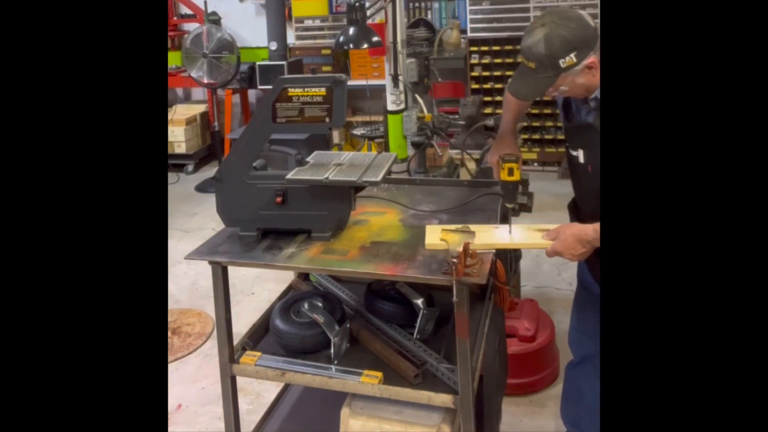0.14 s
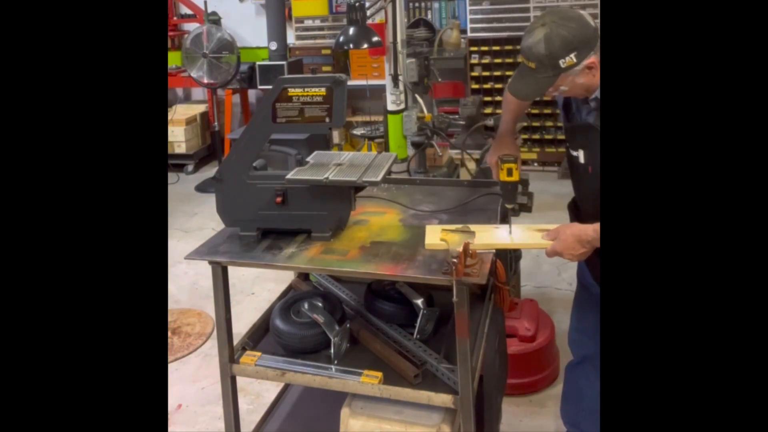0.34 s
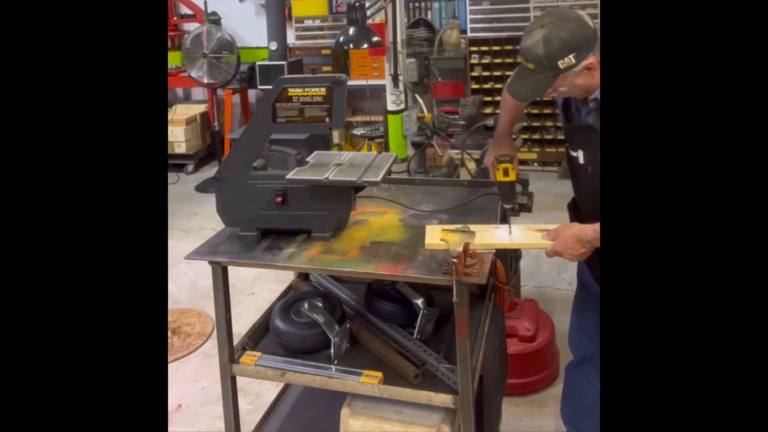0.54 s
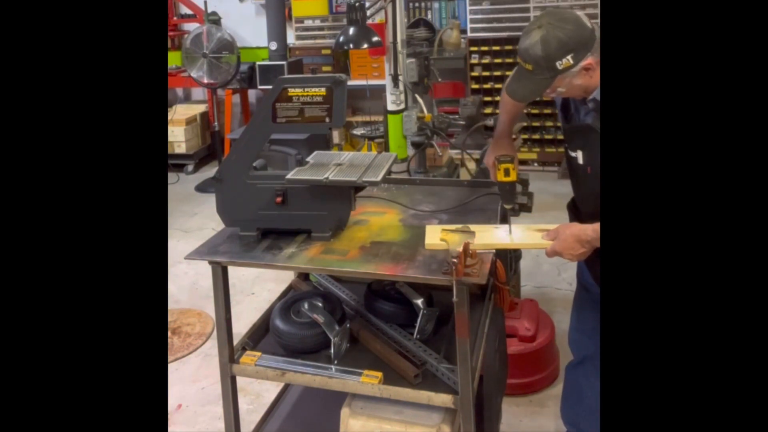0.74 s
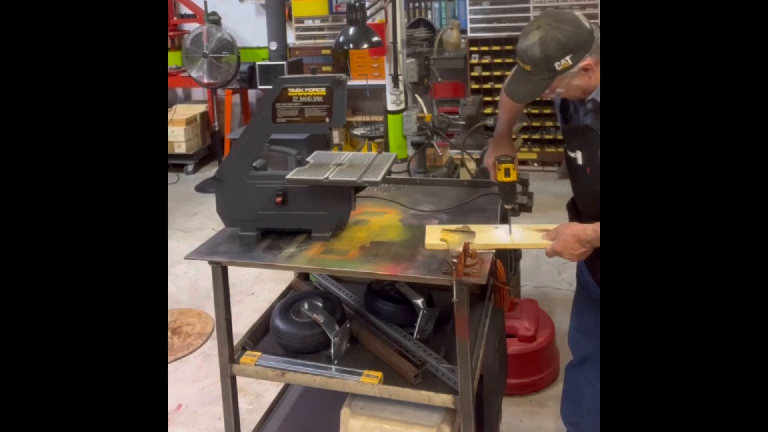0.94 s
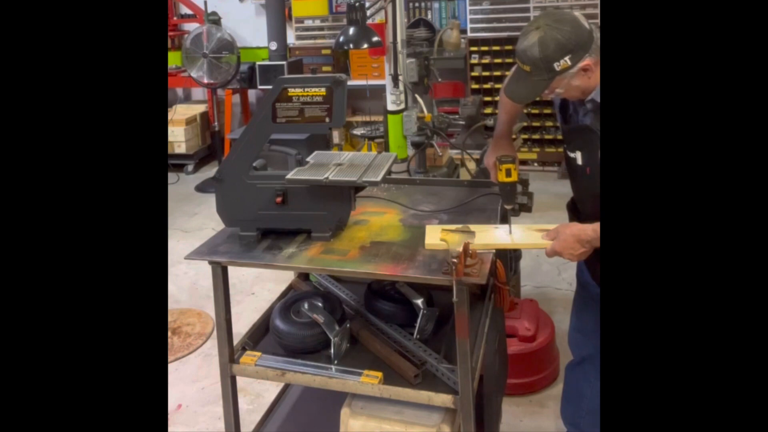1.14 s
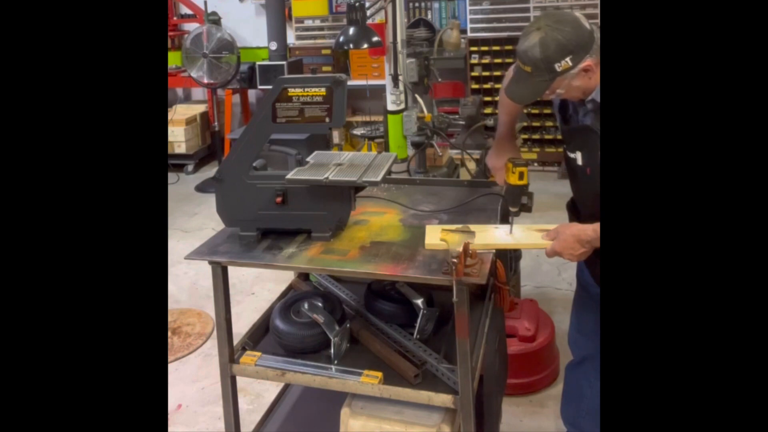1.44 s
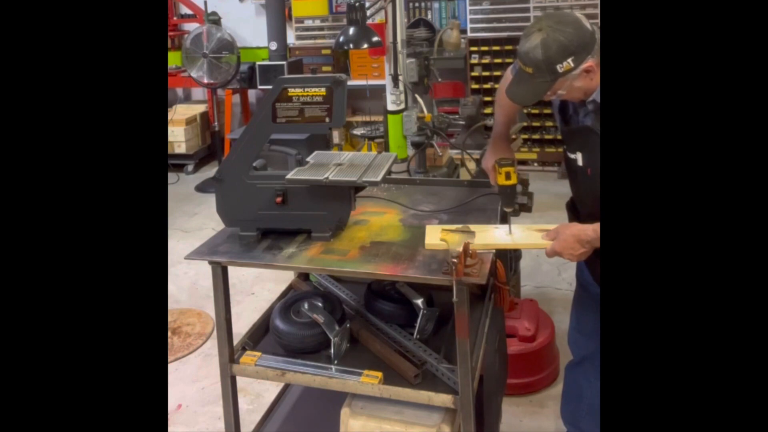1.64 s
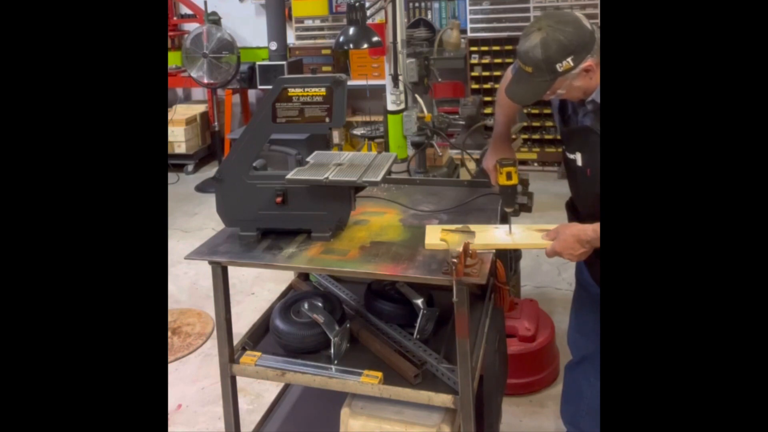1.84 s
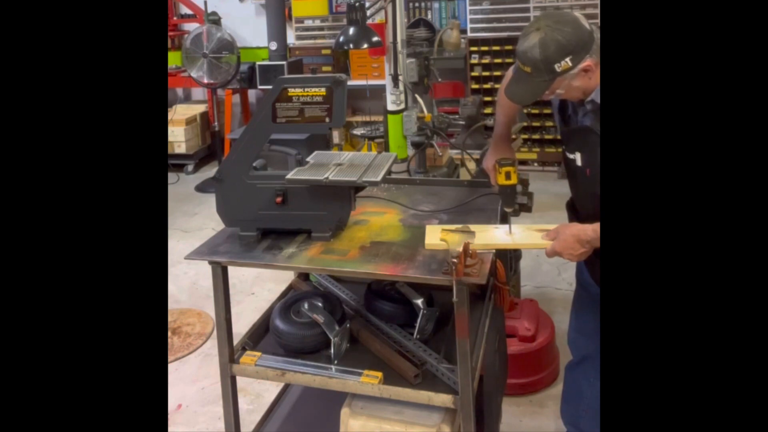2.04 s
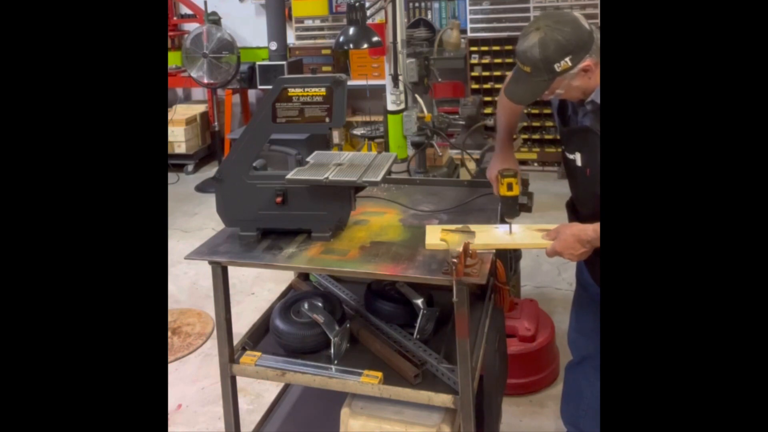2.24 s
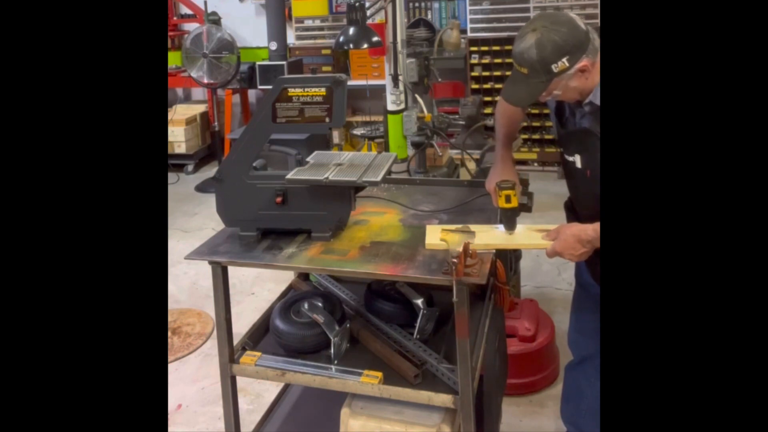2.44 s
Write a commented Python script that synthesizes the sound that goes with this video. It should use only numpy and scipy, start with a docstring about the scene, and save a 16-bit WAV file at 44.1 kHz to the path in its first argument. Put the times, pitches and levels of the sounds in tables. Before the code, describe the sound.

In a live-sounding workshop, a hand drill grinds into wood at nearly constant speed, sags briefly midway, then breaks through with a quick low knocking shudder and runs on lighter and cleaner, heard fairly near in stereo.

```python
"""A cordless drill bores through a wooden board in a workshop.
The motor whines in tones locked to its speed and its gears rattle in a resonant housing;
the bit rasps as random fibre snaps, rings, squeals and excites the board's modes, and the speed sags when it bites.
The bit breaks through with a short knocking shudder of struck modes, drags once in the hole and runs on free.
A fan hiss and a coloured background lie beneath; a diffuse room surrounds the microphone pair."""
import sys
import numpy as np
from scipy import signal
from scipy.fft import rfft, irfft, next_fast_len
from scipy.io import wavfile

SR = 44100
rng = np.random.default_rng(int(sys.argv[2]) if len(sys.argv) > 2 else 0)


def pcm_store(signal):
    """Save signal as 16-bit PCM."""
    levels = np.round(np.clip(np.atleast_2d(signal), -1, 1) * 32767)
    wavfile.write(sys.argv[1], SR, levels.astype(np.int16).T)


N = 114660
TIME = np.arange(N) / SR
SIZE = next_fast_len(N + SR)
HZ = np.maximum(np.fft.rfftfreq(SIZE, 1 / SR), 1)

# modes of the board: [f/Hz, width/Hz, relative level/dB under the cutting edge, relative level/dB when knocked]
BOARD_MODES = [(59.7, 9.5, -12, -6), (151.2, 6, -15, -5), (197, 4.1, -10, -0.5), (290.6, 6.8, -20.5, 8.5),
               (319.3, 16, -0.5, -10), (362, 10, -19, 0), (446.6, 11, -5, 2), (535, 29, -8, -18),
               (627, 21, -1.5, 4), (891, 120, -13, -8)]

# motor and gear tones
CUT_WHINE_DB, FREE_WHINE_DB = 1, 2.5
SPIN_UP_S, FREED_S, FREEING_S = 0.15, 2.2, 0.12
TONE_FLUTTER_HZ, SPEED_WOBBLE = 12, .0009
HUM_BELOW, HUM_DB = 2, -2.5  # tones below this multiple of the speed follow the board's drone
# gear rattle: grinding noise is relative to clashes of unit power
RATTLE_DB, TEETH_PER_TURN, TOOTH_SPREAD_DB, GRIND = 2.5, 4.2, 2, 0.51
GEAR_RATIO, TURN_SWING_DB, FLICKER_DB = 24, 0.38, 0.86  # motor turns per chuck turn
# cutting: snaps are relative to a rub of unit power
CHIPS_PER_S, CHIP_SPREAD_DB, CHIP_SHARE = 3000, 2, 0.41
RASP_DB, BIT_DB, BOARD_DB = 4, -31.5, -6
FAN_DB, FLOOR_DB = -35.5, -60
SQUEAL_ROUGH, SQUEAL_FLUTTER_HZ = 0.37, 60
# stick-slip judder: slips per s, their relative unevenness, level
JUDDER_START_S, JUDDER_ATTACK_S, JUDDER_HOLD_S, JUDDER_RELEASE_S = 2.171, .006, .027, .006
JUDDER_HZ, JUDDER_UNEVEN, JUDDER_DB, JUDDER_OVERTONE_DB = 345, .08, -22, -14
# knocks of the breakthrough
THUD_DB, KNOCK_S, SPLINTER_DB, SPLINTER_S = -17, 0.0027, -21.5, 0.0051
BUMP_HZ, BUMP_WIDTH_HZ, BUMP_DB = 395, 220, -9
BOOM_T60_S, BOOM_HZ, BOOM_DB = 0.18, 270, -5
# room: how far the noise and the tones depart from direct sound
ROOM_T60_S, NOISE_ROOM, TONE_ROOM = 0.62, 0.87, 0.12
LOW_CUT_HZ, CUTOFF_HZ = 35, 15750


def from_db(db):
    """Level to amplitude: 20 dB is a factor of ten."""
    return 10 ** (np.asarray(db) / 20)


def rms_one(x):
    """Power normalisation: the mean square becomes one."""
    return x / np.sqrt(np.mean(x ** 2) + 1e-20)


def in_time(rows):
    """Linear interpolation of each column of a curve at every sample."""
    s, *columns = np.transpose(rows)
    return [np.interp(TIME, s, column) for column in columns]


def in_hz(rows):
    """Interpolation of each column of a spectrum along logarithmic frequency."""
    hz, *columns = np.transpose(rows)
    return [np.interp(np.log(HZ), np.log(hz), column) for column in columns]


def filtered(x, response):
    """Linear filtering: multiplication of the spectrum by a frequency response."""
    return irfft(rfft(x, SIZE) * response, SIZE)[..., :N]


def coloured(x, spectrum):
    """Spectral shaping of a source, brought to unit power."""
    return rms_one(filtered(x, from_db(in_hz(spectrum)[0])))


def resonance(hz, width_hz):
    """Damped oscillator: the response of one mode, 1 at its peak."""
    return 1 / (1 + 1j * (HZ ** 2 - hz ** 2) / (HZ * width_hz))


def drift(rate_hz):
    """Low-pass random process: slow chance with spread 1."""
    return rms_one(filtered(rng.standard_normal(SIZE), 1 / (1 + (HZ / rate_hz) ** 2)))


def tone(cycles, rough, flutter_hz):
    """Random amplitude and phase modulation: a fluttering sine of unit power."""
    flutter = 1 + rough * (drift(flutter_hz) + 1j * drift(flutter_hz))
    return rms_one(np.real(flutter * np.exp(2j * np.pi * cycles)))


def hiss(spectrum, db):
    """Stationary random noise of a given colour and level."""
    return from_db(db) * coloured(rng.standard_normal(N), spectrum)


def tail(t60_s):
    """Exponential decay of a diffuse field: the response of a room tail with unit energy."""
    decaying = rng.standard_normal(N) * from_db(-60 * TIME / t60_s)
    return rfft(rms_one(decaying) / np.sqrt(N), SIZE)


def whine(turns, rattle_db, drone_db):
    """Rotational tones: fixed multiples of the speed, a cluster under load, a few clear ones running free."""
    # [multiple of motor speed, relative level/dB in the cut, relative level/dB running free,
    #  share of the load's swing followed, flutter 0-1]
    tones = [(.725, -56, -60, 0, .4), (.947, -54, -53, .5, .3), (.968, -51, -60, .8, .4),
             (1.002, -46.5, -59, 1.3, .35), (1.037, -49, -62, .6, .5), (1.253, -57, -66, 1, .4),
             (1.47, -55, -64, 1, .3), (3.078, -49, -56, 1, .4), (3.21, -49, -56, 1, .4),
             (3.795, -48, -54, 1, .4), (4.01, -45.5, -48, 1, .4), (4.137, -44, -52, 1, .4),
             (4.234, -45, -52, 1, .4), (4.313, -58, -40, 0, .3), (4.47, -46, -54, 1, .4),
             (4.89, -56, -44, 0, .3), (5.6, -48, -52, 1.5, .6), (5.728, -53, -45, 0, .25),
             (7.582, -46.5, -41, 1.2, .2), (8.125, -45.5, -54, 2.4, .3), (9.82, -51, -56, .6, .35),
             (10.51, -53, -58, 1, .35), (13.26, -50, -58, .6, .35), (18, -39, -39.5, -.3, .35),
             (36, -57, -58, 0, .35)]
    free = np.clip((TIME - FREED_S) / FREEING_S, 0, 1)
    out = 0
    for multiple, cut_db, free_db, follows, rough in tones:
        load_db, path_db = (drone_db, HUM_DB) if multiple < HUM_BELOW else (rattle_db, 0)
        loaded_db = CUT_WHINE_DB + cut_db + follows * (load_db - load_db.mean())
        db = path_db + (1 - free) * loaded_db + free * (FREE_WHINE_DB + free_db)
        out = out + from_db(db) * tone(multiple * turns, rough, TONE_FLUTTER_HZ)
    return out * np.minimum(TIME / SPIN_UP_S, 1)


def gears(turns):
    """Impact excitation of resonances: teeth clash unevenly and grind, and the housing rings with them."""
    # broad colour of the rattle: [f/Hz, relative level/dB per Hz]
    rattle = [(150, -50), (300, -10.5), (750, -9.5), (1100, -7.5), (1400, -1.5), (1900, 0), (2600, -4.5),
              (3400, -5), (5000, -19), (9000, -15.5)]
    # resonances of the housing: [f/Hz, width/Hz, lift/dB]
    housing_modes = [(1278, 74, 2.1), (1473, 17, 1.3), (1500, 96, 2.8), (1720, 25, 1.6), (1979, 58, 3.2),
                     (2373, 150, 5.6), (2444, 46, 4.1), (2903, 71, 4)]
    contacts = np.diff(np.floor(turns * TEETH_PER_TURN), prepend=0)
    spread = from_db(TOOTH_SPREAD_DB * np.tanh(drift(280)))
    clashes = contacts * rng.standard_normal(N) * spread
    housing = from_db(in_hz(rattle)[0])
    for hz, width_hz, lift_db in housing_modes:
        housing = housing * (1 + (from_db(lift_db) - 1) * resonance(hz, width_hz))
    force = rms_one(clashes) + GRIND * rng.standard_normal(N)
    return rms_one(filtered(force, housing))


def chips():
    """Shot noise: wood fibres snap at random over a smooth rub."""
    sizes = from_db(CHIP_SPREAD_DB * np.minimum(rng.exponential(1, N), 5))
    signed = sizes * rng.choice([-1, 1], N)
    snaps = rms_one(signed * (rng.random(N) < CHIPS_PER_S / SR))
    return rms_one(CHIP_SHARE * snaps + rng.standard_normal(N))


def cutting(rasp_db, drone_db):
    """Forced vibration: random cutting forces rasp, ring the bit and drive the board's modes."""
    # colour of the rasp: [f/Hz, relative level/dB per Hz]
    rasp_colour = [(800, -22), (2200, -7), (3800, -.5), (5200, -1.3), (6400, 0), (7400, 0), (8150, 3.5),
                   (8900, .5), (9600, -4), (10500, -9), (11400, -11), (15700, -13)]
    # ringing of the bit: [f/Hz, width/Hz, relative level/dB]
    bit_modes = [(3475, 125, 11), (3790, 120, 3), (4500, 190, 1.5)]
    # how hard the bit rubs in the hole: [t/s, relative level/dB]
    rubbing = [(0, -9.5), (.6, -8.5), (.87, -3.5), (1.3, -3), (1.41, -14), (1.58, -4), (2.05, -1),
               (2.25, -12), (2.6, -28)]
    rasp = coloured(chips(), rasp_colour)
    bit_response = sum(from_db(db) * resonance(hz, width) for hz, width, db in bit_modes)
    board_response = sum(from_db(db) * resonance(hz, width) for hz, width, db, _ in BOARD_MODES)
    bit = rms_one(filtered(chips(), bit_response))
    board = rms_one(filtered(chips(), board_response))
    out = from_db(RASP_DB + rasp_db) * rasp
    out = out + from_db(BIT_DB + in_time(rubbing)[0]) * bit
    return out + from_db(BOARD_DB + drone_db) * board


def cooling_fan():
    """Broadband flow noise: the steady hiss of the motor's cooling fan."""
    # [f/Hz, relative level/dB per Hz]
    fan_colour = [(3000, -21), (10800, 0), (11400, -14.5), (12100, -0.5), (14200, 4.5), (15700, -2.5)]
    return hiss(fan_colour, FAN_DB)


def background():
    """Stationary background noise of the workshop, strongest in the bass."""
    # [f/Hz, relative level/dB per Hz]
    floor_colour = [(10, -51.5), (30, -12), (45, -4), (60, -7), (85, -7), (150, 1.5), (400, -15),
                    (2000, -27.5)]
    return hiss(floor_colour, FLOOR_DB)


def squeals():
    """Narrow-band modulation: each brief squeal is a rough tone that swells and dies away."""
    # [t/s of the middle, length/s, f/Hz, level/dB at the middle]
    calls = [(0.745, 0.071, 1750, -29), (1.126, 0.046, 3480, -32.5), (1.26, 0.048, 1730, -32.5),
             (1.338, 0.11, 1410, -33), (1.431, 0.086, 1325, -34.5), (1.577, 0.068, 3500, -33),
             (1.586, .09, 1790, -34.5), (1.708, 0.22, 3500, -40.5), (1.804, 0.034, 1850, -25.5),
             (2.492, 0.12, 1855, -32.5)]
    out = 0
    for s, length_s, hz, db in calls:
        swell = np.cos(np.pi * np.clip((TIME - s) / length_s, -.5, .5))
        out = out + from_db(db) * swell * tone(hz * TIME, SQUEAL_ROUGH, SQUEAL_FLUTTER_HZ)
    return out


def judder():
    """Stick-slip friction: the bit catches in the last fibres with a short, solid, uneven grunt."""
    age = TIME - JUDDER_START_S
    release = np.exp(-np.maximum(age - JUDDER_HOLD_S, 0) / JUDDER_RELEASE_S)
    level = np.clip(age / JUDDER_ATTACK_S, 0, 1) * release
    slip_hz = JUDDER_HZ * (1 + JUDDER_UNEVEN * drift(97))
    phase = 2 * np.pi * np.cumsum(slip_hz) / SR
    wave = np.sin(phase) + from_db(JUDDER_OVERTONE_DB) * np.sin(2 * phase)
    return from_db(JUDDER_DB) * level * wave


def breakthrough():
    """Transient modal excitation: fibres splinter, knocks ring bump and board, and the room booms low."""
    # [t/s, relative thud level/dB, relative splinter level/dB]
    knocks = [(2.171, -26, -3), (2.183, -9, 8), (2.193, -7, 3), (2.207, -5, 2.5), (2.235, -12, -6),
              (2.316, -19, -6)]
    # colour of the splintering: [f/Hz, relative level/dB per Hz]
    splinter_colour = [(300, -3.5), (850, 5.5), (2000, -1), (3300, -2), (4900, 4), (7000, -8),
                       (15000, -10.5)]

    def burst(s, decay_s):
        """Relaxation: a sudden onset and exponential decay."""
        return (TIME >= s) * np.exp(-np.abs(TIME - s) / decay_s)

    pushes = sum(from_db(db) * burst(s, KNOCK_S) for s, db, _ in knocks)
    cracks = sum(from_db(db) * burst(s, SPLINTER_S) for s, _, db in knocks)

    def struck(hz, width_hz):
        """Resonant response of one mode to pushes carried at its own frequency."""
        carrier = np.cos(2 * np.pi * (hz * TIME + rng.random()))
        return filtered(pushes * carrier, resonance(hz, width_hz))

    bump = from_db(BUMP_DB) * struck(BUMP_HZ, BUMP_WIDTH_HZ)
    board = sum(from_db(db + THUD_DB) * struck(hz, width) for hz, width, _, db in BOARD_MODES)
    thud = judder() + bump + board
    boom = from_db(BOOM_DB) * filtered(thud, tail(BOOM_T60_S) / (1 + (HZ / BOOM_HZ) ** 2))
    splinters = from_db(SPLINTER_DB) * cracks * coloured(chips(), splinter_colour)
    return thud + boom + splinters


def workshop(x, wetness):
    """Direct and diffuse fields: two microphones hear sound out of step in an already ringing room."""
    # [f/Hz, share of direct sound at wetness 1, lead of the left side/rad, left-right level difference/dB]
    pair = [(60, .97, 0, .5), (160, .93, 0, 0), (290, .95, -.1, 2), (450, .85, -.3, 2.7),
            (780, .4, -1.8, 2), (1210, .65, .3, 2.5), (1850, .45, -1.9, 5.6), (2550, .45, -2.7, 2.5),
            (3400, .5, .2, .5), (4300, .5, 0, .5), (5600, .5, .9, .4), (7400, .7, 2, 0), (8000, .9, 2.5, 0),
            (8400, 1, 3.14, 0), (10750, 1, 3.14, 0), (11700, .9, 5.5, 0), (13000, .95, 6.2, 0),
            (15500, .97, 6.3, 0)]
    direct, lead, balance_db = in_hz(pair)
    wet = np.clip((1 - direct) * wetness, 0, 1)
    sides = np.array([[1], [-1]])
    room = np.array([tail(ROOM_T60_S), tail(ROOM_T60_S)])
    # the filter is circular, so a run-in at the end of the buffer rings on into the start
    run_in = x[:SR // 4][::-1]
    x = np.concatenate([x, np.zeros(SIZE - N - len(run_in)), run_in])
    field = np.sqrt(1 - wet) * np.exp(.5j * sides * lead) + np.sqrt(wet) * room
    return filtered(x, from_db(sides * balance_db / 2) * field)


def scene():
    """Superposition: the drill's noise swells a little with each chuck turn; its tones ride on top."""
    # mean motor speed: [t/s, f/Hz in turns per s]
    speed = [(0, 412), (.05, 421), (.12, 430.3), (.35, 431.8), (.8, 430.5), (1.17, 431.3), (1.31, 427),
             (1.37, 400), (1.43, 405), (1.52, 425), (1.65, 430.5), (2.13, 429.5), (2.23, 433), (2.31, 426),
             (2.37, 411), (2.45, 431), (2.6, 430.5)]
    # effort: [t/s, relative levels/dB of gear rattle, rasp of the bit, drone of the board]
    effort = [(0, -33, -35.5, -36.5), (.15, -31.5, -31.5, -46), (.4, -31.5, -32, -42.5),
              (.62, -31, -33, -43.5), (.76, -29.5, -31.5, -41), (1.1, -29, -31.5, -40),
              (1.33, -29, -28, -38.5), (1.41, -31, -28.5, -36), (1.58, -28.5, -30.5, -40),
              (1.85, -30, -31.5, -41), (2.14, -29, -30, -43), (2.25, -35, -34, -41),
              (2.35, -34.5, -30, -56), (2.44, -36, -32.5, -45), (2.5, -35, -34, -44),
              (2.6, -37.5, -33, -45)]
    rattle_db, rasp_db, drone_db = in_time(effort)
    turns = np.cumsum(in_time(speed)[0] * (1 + SPEED_WOBBLE * drift(15))) / SR
    turn_swing_db = TURN_SWING_DB * np.sin(2 * np.pi * turns / GEAR_RATIO)
    swell = from_db(turn_swing_db + FLICKER_DB * drift(24))
    rattle = from_db(RATTLE_DB + rattle_db) * gears(turns)
    grinding = swell * (rattle + cutting(rasp_db, drone_db))
    noise = grinding + cooling_fan() + background() + breakthrough()
    tones = whine(turns, rattle_db, drone_db) + squeals()
    return workshop(noise, NOISE_ROOM) + workshop(tones, TONE_ROOM)


def record(dry):
    """Band limiting: the deepest bass is rolled off and the top is cut steeply."""
    low_cut = signal.butter(4, LOW_CUT_HZ, "high", fs=SR, output="sos")
    dry = signal.sosfilt(low_cut, dry)
    return filtered(dry, 1 / np.sqrt(1 + (HZ / CUTOFF_HZ) ** 400))


dry = scene()
out = record(dry)
pcm_store(out)
```